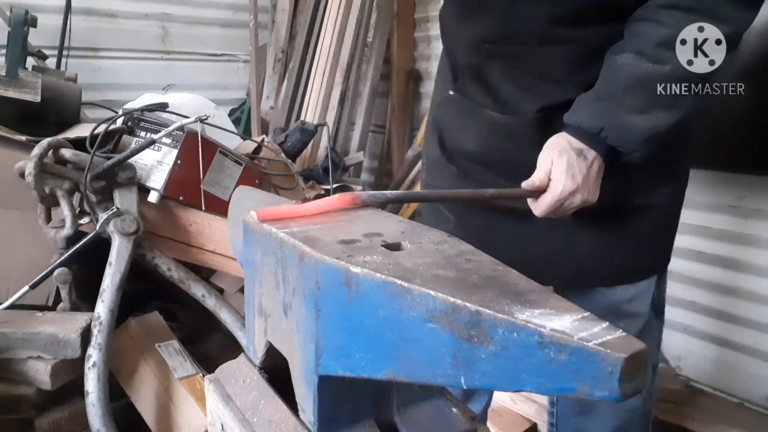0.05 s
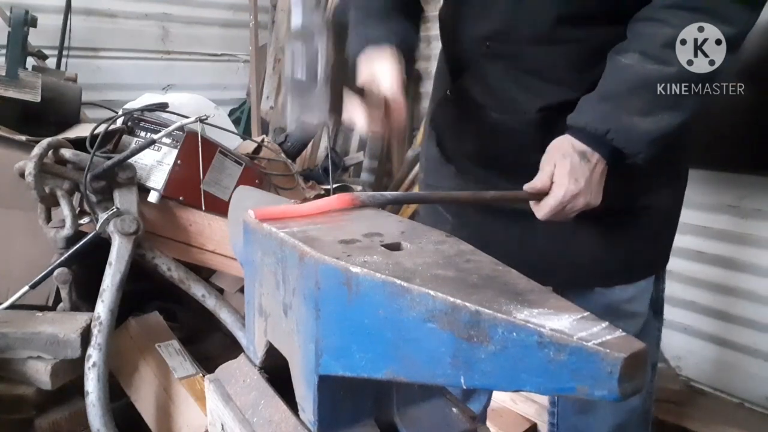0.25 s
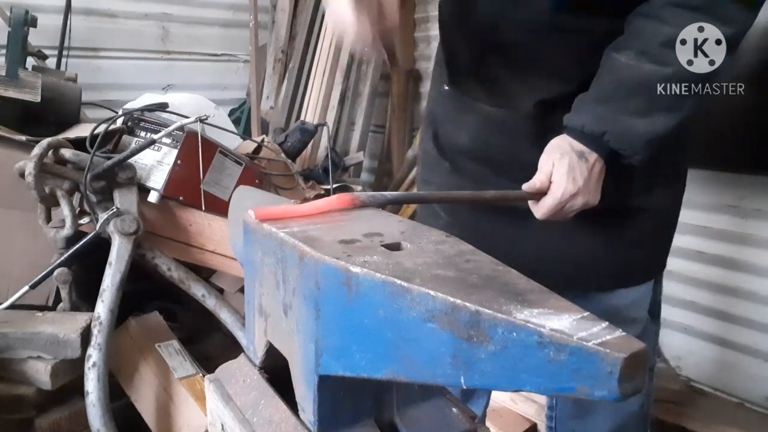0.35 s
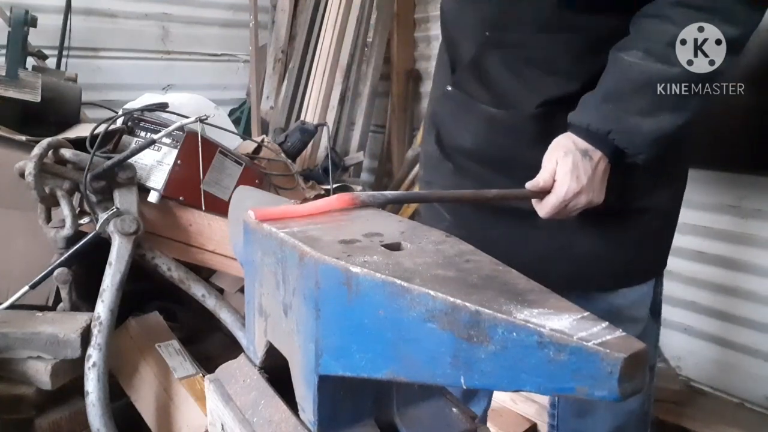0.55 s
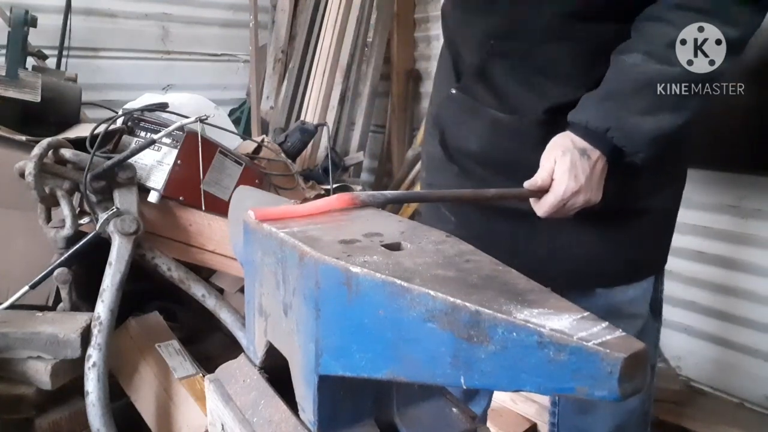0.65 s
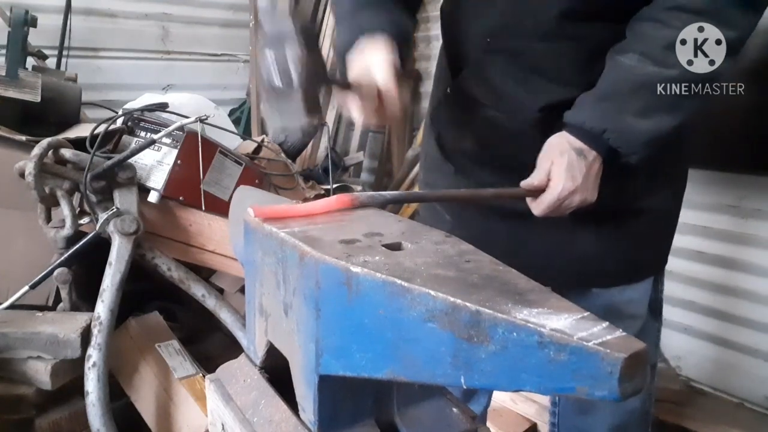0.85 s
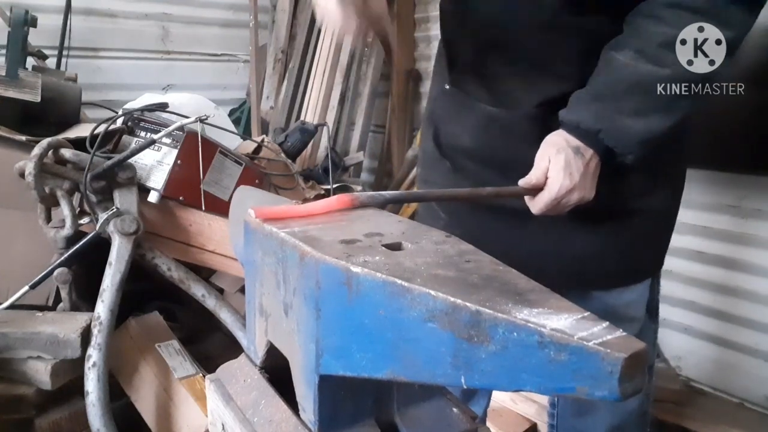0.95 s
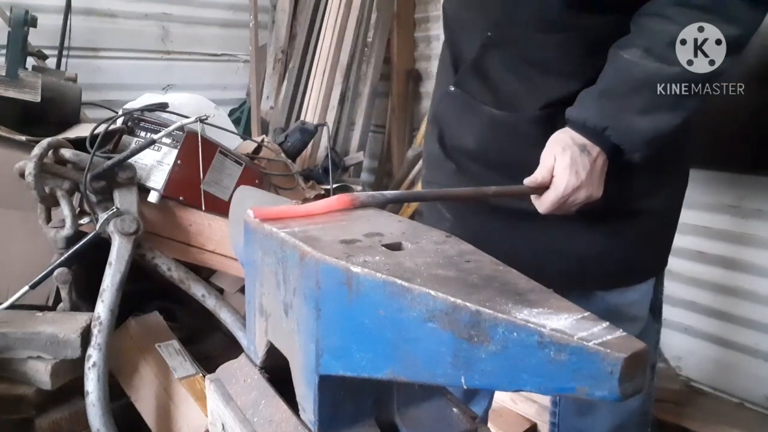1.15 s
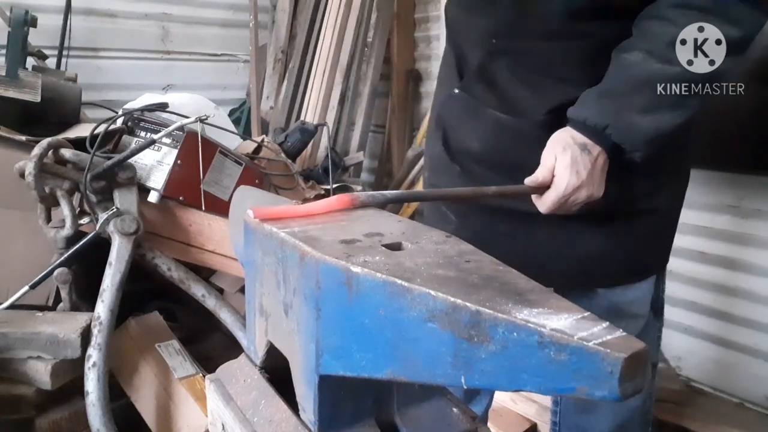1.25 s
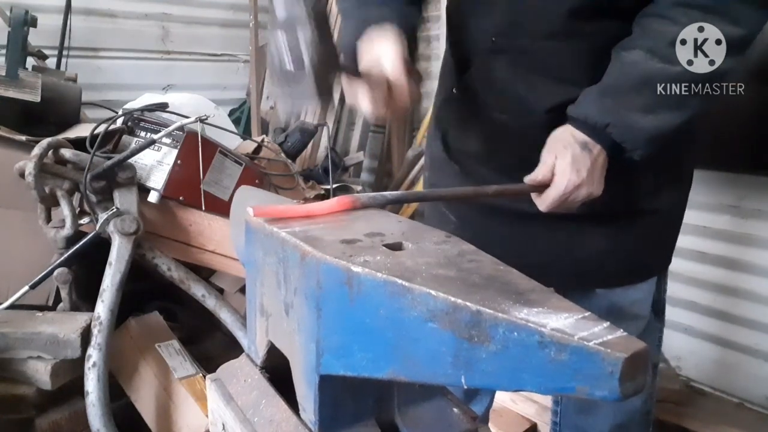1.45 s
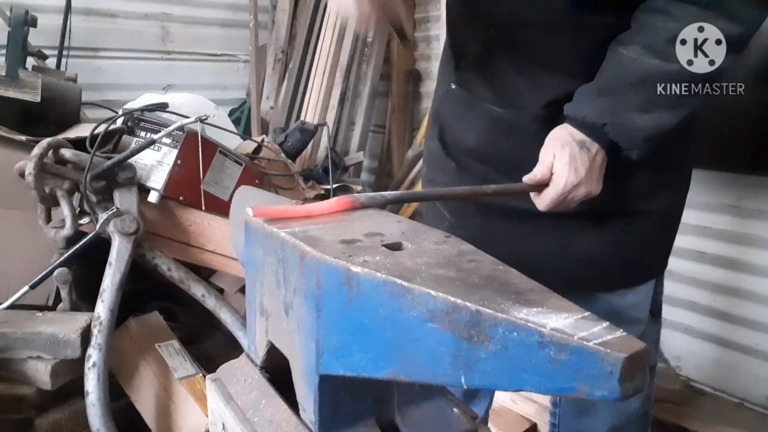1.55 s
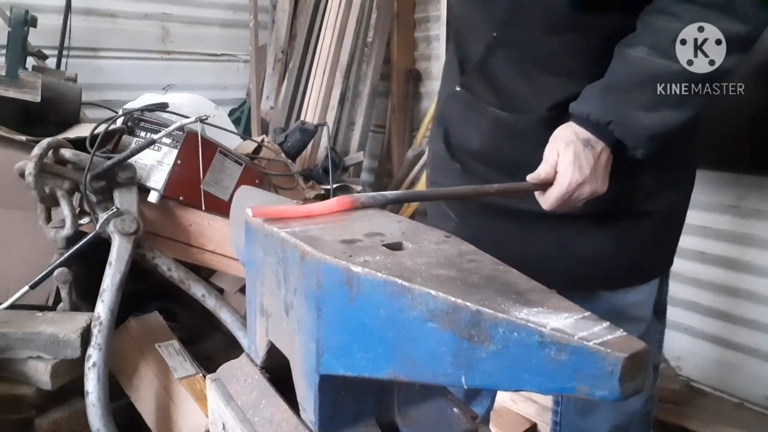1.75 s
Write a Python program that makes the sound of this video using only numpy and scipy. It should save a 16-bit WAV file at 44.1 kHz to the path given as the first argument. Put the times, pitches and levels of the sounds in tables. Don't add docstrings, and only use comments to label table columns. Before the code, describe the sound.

A hammer hits hot steel on an anvil three times, with soft sleeve swishes between the blows, short metallic ringing and dense shed reflections, heard close in stereo with slightly flattened peaks over a quiet fire roar.

```python
import sys
import numpy as np
from scipy import signal
from scipy.io import wavfile

SR = 44100
rng = np.random.default_rng(int(sys.argv[2]) if len(sys.argv) > 2 else 0)


def materialize(psi):
    bounded = np.clip(np.atleast_2d(psi).T, -1, 1)
    quanta = np.round(bounded * 32767).astype(np.int16)
    wavfile.write(sys.argv[1], SR, quanta)


def voltage_ratio(level):
    return 10 ** (np.asarray(level, float) / 20)


N = 79380
LEFT_RIGHT = np.array([[.5], [-.5]])

# start in seconds, then pulse, thump, room tail and ring, all in dB.
BLOWS = [
    (.2271, -2.7, -0.5, 3.5, -2),
    (.8244, -0.3, 7.5, 3.5, -1.5),
    (1.4256, -6.3, 5, 2.5, -4),
]
# frequency in Hz, left-right correlation (-1 to 1).
COHERENCE = [(60, 1), (250, 0.9), (700, 0.31), (1500, -0.15), (3000, 0.08), (8000, -0.088), (15000, -0.065)]


def rms_one(x):
    return x / np.sqrt(np.mean(x ** 2) + 1e-20)


def at_hz(points, hz):
    table_hz, values = np.array(points).T[:2]
    return np.interp(np.log(hz), np.log(table_hz), values)


def near(hz, centre_hz):
    return abs(hz / centre_hz - 1) < .01


def since(s):
    return np.maximum(np.arange(N) / SR - s, 0)


def shape(s, rise, t60):
    t = since(s)
    return (1 - np.exp(-t / max(rise, 1e-4))) * voltage_ratio(-60 * t / max(t60, 1e-3))


def drift(rate_hz):
    hop = 40
    pole = np.exp(-2 * np.pi * rate_hz * hop / SR)
    white = rng.standard_normal(N // hop + 2002)
    slow = rms_one(signal.lfilter([1], [1, -2 * pole, pole * pole], white)[2000:])
    return np.interp(np.arange(N) / hop, np.arange(len(slow)), slow)


def bands(spectrum, patchy_db, rate_hz):
    edges = 40 * 2 ** np.arange(0, 9.1, .5)
    layers = []
    settle = 4000
    white = rng.standard_normal((2, 2, N + settle))
    for k, (low, high) in enumerate(zip(edges, edges[1:])):
        band_pass = signal.butter(2, [low, high], "band", fs=SR, output="sos")
        mid, side = signal.sosfilt(band_pass, white[k % 2])[:, settle:]
        hz = np.sqrt(low * high)
        alike = np.clip(at_hz(COHERENCE, hz), -1, 1)
        gain = voltage_ratio(at_hz(spectrum, hz) + patchy_db * drift(rate_hz))
        stereo = np.sqrt(1 + alike) * mid + np.sqrt(1 - alike) * side * [[1], [-1]]
        layers.append((hz, gain * stereo))
    total = np.sqrt(np.mean(sum(band for _, band in layers) ** 2))
    return [(hz, band / total) for hz, band in layers]


def background():
    # frequency in Hz, density in dB per Hz.
    roar_spectrum = [(24, -33), (40, 0.5), (112, -8.5), (237, -15.5), (345, -3), (412, -28), (615, -16.5),
                     (990, -14.5), (16000, -36.5)]
    # frequency in Hz, density in dB per Hz.
    cloth_spectrum = [(300, -2.5), (700, 1), (2000, 0.5), (5000, -7.5), (16000, -22.5)]
    # start in seconds, level in dB, rise in seconds, fall t60 in seconds.
    swishes = [
        (0.123, -47, 0.026, 0.71),
        (.535, -47.5, 0.0053, 0.45),
        (.722, -41, 0.013, 0.54),
        (1.285, -45.5, .015, 0.28),
        (1.675, -44, 0.018, 0.41),
    ]
    roar = voltage_ratio(-49.5) * sum(band for _, band in bands(roar_spectrum, patchy_db=.6, rate_hz=9))
    moves = sum(voltage_ratio(db) * shape(s, rise, t60) for s, db, rise, t60 in swishes)
    cloth = sum(band for hz, band in bands(cloth_spectrum, patchy_db=-2.0, rate_hz=15) if hz > 300)
    return roar + moves * cloth


def resonance(hz, width_hz, x):
    return signal.lfilter(*signal.iirpeak(hz, hz / width_hz, fs=SR), x)


def shed():
    # frequency in Hz, density in dB per Hz.
    tail_spectrum = [(60, -9.5), (200, -10.5), (860, -3), (2200, -7), (3200, -13), (6000, -23),
                     (10000, -21.5), (15000, -22.5)]
    # frequency in Hz, t60 in seconds.
    tail_t60 = [(60, 0.072), (130, 0.24), (300, 0.24), (1000, 0.23), (3000, 0.31), (8000, 0.33),
                (15000, 0.23)]
    # level in dB at 6800 Hz, proportional to frequency.
    treble = [
        -1,
        1,
        2,
    ]
    # frequency in Hz, bandwidth in Hz, gain.
    shimmer = [(7320, 103, 0.53), (10970, 120, 0.65), (12520, 83, 0.48), (13380, 100, 0.4)]
    tail_db, rise_s = -12, 0.00081
    early_db, early_t60_s = -7, 0.01
    late_db, late_t60_s, late_dull_hz = -19.5, 0.85, 1460
    tick_db, tick_lead_s = -39, 0.0026
    repeat_hz = 1570
    clusters, cluster_width_hz = 24, 170
    layers = bands(tail_spectrum, patchy_db=0.7, rate_hz=83)
    spots = rng.uniform(4100, 15000, (len(BLOWS), clusters))
    out = np.zeros((2, N))
    for (s, _, _, db, _), treble_db, cluster_hz in zip(BLOWS, treble, spots):
        tail = np.zeros((2, N))
        tick = voltage_ratio(tick_db) * shape(s - tick_lead_s, .002, 0.026)
        for hz, band in layers:
            main = shape(s, rise_s, at_hz(tail_t60, hz))
            early = voltage_ratio(early_db) * shape(s, rise_s, early_t60_s)
            late = voltage_ratio(late_db) / (1 + hz / late_dull_hz) * shape(s, 0.044, late_t60_s)
            env = voltage_ratio(db + tail_db + treble_db * hz / 6800.0) * (main + early + late) + tick
            same = 1 / (1 + (hz / repeat_hz) ** 2)
            common = np.roll(band, int(s * SR), axis=1)
            fresh = np.roll(band, N // 2, axis=1)
            tail += env * (np.sqrt(1 - same) * fresh + np.sqrt(same) * common)
        out += tail + sum(resonance(hz, cluster_width_hz, tail) for hz in cluster_hz)
    return out + sum(gain * resonance(hz, width_hz, out) for hz, width_hz, gain in shimmer)


def impact():
    # start in seconds, level in dB, left-right in dB.
    rebound = (1.4269, -9, 16)
    # frequency in Hz, level in dB, t60 in seconds.
    stand_modes = [(103, -5.5, 0.023), (171.6, -10, 0.028), (338.6, -22.5, 0.066), (64.7, -10, 0.037)]
    thump_pan = [
        7,
        1,
        -4,
    ]
    pulse_s, pulse_db = .00018, 9
    floor_echo_s, floor_echo_db = 0.00427, -8
    thump_delay_s, thump_lag_rad = .0007, 0.93
    direct = [(s, db, 0) for s, db, *_ in BLOWS]
    echoes = [(s + floor_echo_s, db + floor_echo_db, 0) for s, db, _ in direct]
    out = np.zeros((2, N))
    for s, db, pan_db in direct + echoes + [rebound]:
        t = since(s) / pulse_s
        out -= voltage_ratio(pulse_db + db + pan_db * LEFT_RIGHT) * t * np.exp(-t)
    for (s, _, db, _, _), pan_db in zip(BLOWS, thump_pan):
        start = s + thump_delay_s
        for hz, level_db, t60 in stand_modes:
            gain = voltage_ratio(db + level_db + pan_db * LEFT_RIGHT)
            wave = np.sin(2 * np.pi * hz * since(start) - thump_lag_rad * LEFT_RIGHT)
            out += gain * shape(start, 0.0026, t60) * wave
    return out


def anvil():
    # frequency in Hz, starting sign.
    pair_pitch = [(2487.6, 1), (2492.4, -1), (3154.5, 1), (3160.5, 1), (72, -1), (81.6, 1), (220.5, 1),
                  (235.8, 1), (2483, 1), (228, 1)]
    # level in dB, t60 in seconds, swell in seconds.
    pair_decay = [(-3.5, 0.23, 0.037), (-13, 0.4, 0.0013), (-22.5, 0.44, 0.0057), (-18, 0.29, 0.0048),
                  (-39, 1.05, 0.14), (-38, 1.32, 0.11), (-32, 0.56, 0.0033), (-28, 0.56, 0.0035),
                  (-34, 0.64, 0.015), (-40.5, 1.04, 0.0067)]
    single_pitch = [494, 755, 878, 940, 1083, 1484, 1890, 2438, 4200, 5312, 6982]
    # level in dB, t60 in seconds, swell in seconds.
    single_decay = [(-27, 0.11, 0.015), (-8.5, 0.099, 0.0033), (-13.5, 0.28, 0.023), (-16.5, 0.24, 0.026),
                    (-21, 0.29, 0.0033), (-18, 0.18, 0.016), (-35.5, 0.68, 0.046), (-20.5, 0.36, 0.035),
                    (-33, 0.3, .02), (-23, 0.33, 0.0067), (-26, 0.31, 0.041)]
    ring_tilt = [
        -1.5,
        0.5,
        4,
    ]
    swell_scale = [
        0.67,
        1.1,
        0.96,
    ]
    scatter_db, main_lag_rad = .7, .8
    modes = [(hz, sign, *rest) for (hz, sign), rest in zip(pair_pitch, pair_decay)]
    modes += [(hz, 1, *rest) for hz, rest in zip(single_pitch, single_decay)]
    chance = rng.standard_normal((len(modes), len(BLOWS)))
    apart = np.repeat(rng.uniform(-1, 1, len(modes)), 2)[:len(modes)]
    out = np.zeros((2, N))
    for (hz, sign, level_db, t60, swell), luck, gap in zip(modes, chance, apart):
        turn = gap * np.arccos(np.clip(at_hz(COHERENCE, hz), -1, 1))
        if near(hz, 2488):
            turn = main_lag_rad
        for (s, *_, db), a, tilt_db, slow in zip(BLOWS, luck, ring_tilt, swell_scale):
            gain = sign * voltage_ratio(db + level_db + scatter_db * a + tilt_db * near(hz, 3157))
            wave = np.sin(2 * np.pi * hz * since(s) + turn * LEFT_RIGHT)
            out += gain * shape(s, swell * slow, t60) * wave
    return out


def scene():
    right_db = 1.13
    return (background() + shed() + impact() + anvil()) * voltage_ratio(-right_db * LEFT_RIGHT)


def top_cut(x):
    return signal.sosfilt(signal.butter(12, 16620, fs=SR, output="sos"), x)


def record(dry):
    notch_hz, notch_width_hz, notch_share = 8060, 1800, 0.52
    limit_db, attack_s, release_db_per_s = -14.5, 0.0015, 291
    clip_top = 0.99
    x = dry - notch_share * resonance(notch_hz, notch_width_hz, dry)
    x = signal.sosfilt(signal.butter(3, 63, "high", fs=SR, output="sos"), x)
    r = np.exp(-1 / (attack_s * SR))
    power = signal.lfilter([1 - r], [1, -r], np.mean(x ** 2, axis=0))
    level = 10 * np.log10(power + 1e-12)
    fall = release_db_per_s * np.arange(N) / SR
    held = np.maximum.accumulate(level + fall) - fall
    over = np.maximum(held - limit_db, 0)
    x = x * voltage_ratio(-signal.lfilter([1 - r], [1, -r], over))
    x = clip_top * np.tanh(x / clip_top)
    x = signal.sosfilt(signal.cheby2(14, 40, 15620, fs=SR, output="sos"), x)
    return top_cut(x)


dry = scene()
out = record(dry)
materialize(out)
```